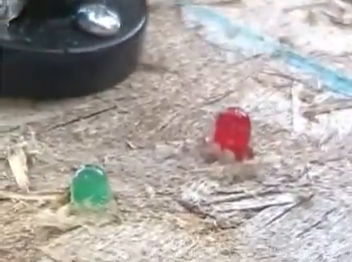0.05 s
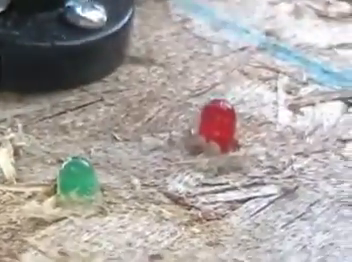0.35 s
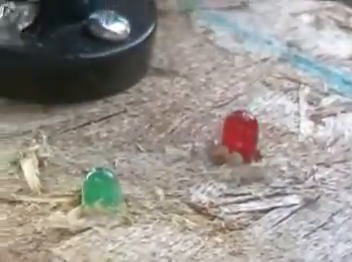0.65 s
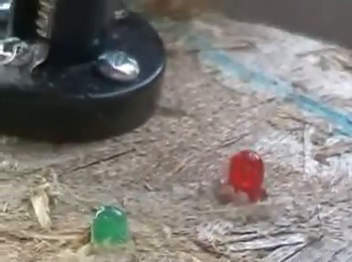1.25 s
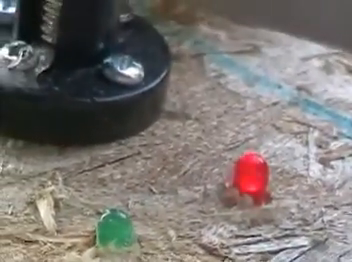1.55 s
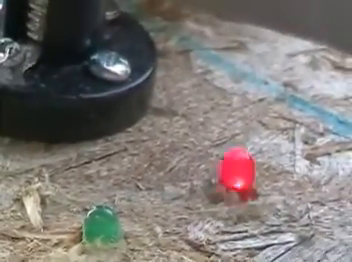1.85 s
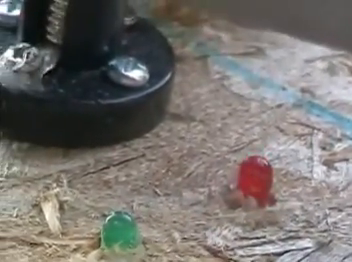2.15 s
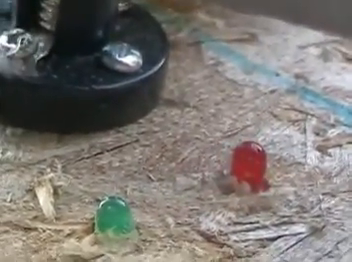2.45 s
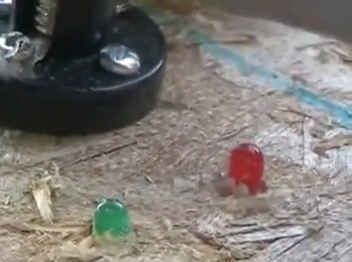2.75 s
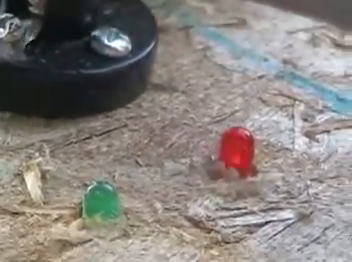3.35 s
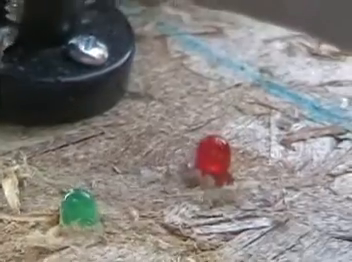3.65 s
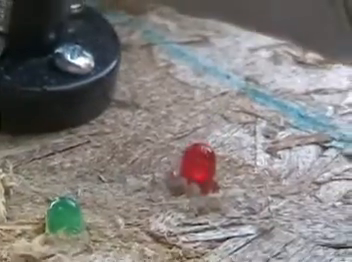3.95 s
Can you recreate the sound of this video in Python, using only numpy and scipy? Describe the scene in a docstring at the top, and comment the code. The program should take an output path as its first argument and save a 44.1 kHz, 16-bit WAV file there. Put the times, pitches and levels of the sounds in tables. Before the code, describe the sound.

A small generator clacks steadily for the whole four seconds, four or five hard, briefly ringing knocks a second, close up indoors. A low hum, rumble and fine watery hiss run underneath throughout. Lighter rattles, short scratches and dull bumps of a wooden board fall between the clacks, strongest at about 1.5 seconds, again from 2.4 to 2.8, and around 3.3 seconds.

```python
"""Small generator on a wooden board, indoors, close up.

A loose part clacks on the housing four or five times a second and rings its modes.
Lighter rattles, treble scratches, brief low tones and dull bumps of the board fall between.
Under them run a low hum, a rumble and a fine watery hiss. A limiter dips the gain after each clack."""
import sys
import numpy as np
from scipy import signal
from scipy.fft import rfft, irfft
from scipy.io import wavfile
from scipy.ndimage import uniform_filter1d, minimum_filter1d

SR = 44100
rng = np.random.default_rng(int(sys.argv[2]) if len(sys.argv) > 2 else 0)


def put_to_file(sound):
    """Save the sound as 16-bit audio at rate SR, in the file named by the first command-line argument."""
    columns = np.atleast_2d(sound).T  # one column per channel
    safe = np.clip(columns, -1, 1)
    whole_steps = np.round(safe * 32767)
    wavfile.write(sys.argv[1], SR, whole_steps.astype(np.int16))


N = 176400

# Generator tones. Each row: frequency in Hz, level in dB, rms waver in Hz.
HUM_TONES = [(118.05, -32.5, 0.99), (59.9, -48, 5.1), (72.2, -50.5, 2.3), (185.7, -46, 5.4),
             (440.4, -49.5, 4.88), (545, -54.5, 5.24), (640.7, -46.5, 4.44)]
# Rumble spectrum. Each row: frequency in Hz, gain in dB.
RUMBLE_EQ = [(20, -52), (35, -30), (55, -31), (80, -19), (108, -12.5), (140, -10.5), (180, -16.5),
             (250, -17), (320, -18), (385, -33.5), (600, -26.5), (2000, -88)]
# Hiss spectrum. Each row: frequency in Hz, gain in dB.
HISS_EQ = [(100, -79), (380, -30.5), (480, -26), (700, -23), (1000, -22.5), (2000, -22), (2800, -25),
           (4000, -28), (5000, -34.5), (6300, -40.5), (8000, -42), (10000, -38), (12500, -46.5),
           (14500, -58)]
# Hiss envelope. Each row: time in seconds, gain in dB.
HISS_ENVELOPE = [(0, -1.5), (.5, 2.5), (1, -0.5), (1.5, 2.5), (1.8, 1), (2.2, 1.5), (2.6, 3), (2.95, 1),
                 (3.3, 3.5), (3.65, 2), (3.85, 2), (4, 1)]
# Housing modes. Each row: frequency in Hz, level in dB, T60 in seconds.
HOUSING_MODES = [(640, -11, 0.12), (755, -0.5, 0.066), (960.3, 1.5, 0.1), (1190, -7.5, 0.22),
                 (1300, -6, 0.047), (1476.1, 3, 0.16), (1590, -2.5, 0.11), (1769, -12, 0.21),
                 (2080, -4, 0.06), (2485, -35, 0.064), (2526, -35, 0.079), (2990, 5, 0.052),
                 (3460, -12, 0.031), (4360, -16, 0.023)]
# Contact rasp spectrum. Each row: frequency in Hz, gain in dB.
RASP_EQ = [(100, -7), (380, -8), (650, -7), (1000, -2), (2000, -1.5), (3000, -3), (4300, -2.5),
           (5200, -13.5), (6300, -16), (8000, -23), (10000, -23), (14500, -40)]
# Contact rasp decay. Each row: frequency in Hz, T60 in seconds.
RASP_T60 = [(400, 0.094), (1500, 0.14), (3000, 0.043), (6000, 0.047), (14000, 0.013)]
# Light blows. Each row: start in seconds, level in dB, boosted frequency in Hz.
RATTLE_HITS = [(.044, -22.5, 3560), (.369, -18.5, 1740), (0.718, -14, 2140), (.798, -21, 790),
               (1.17, -15, 740), (1.255, -21, 1890), (1.484, -12, 1470), (1.505, -4.5, 930),
               (1.595, -39, 2900), (2.125, -30, 1390), (2.411, -10, 990), (2.48, -15.5, 2000),
               (2.578, -12, 1390), (2.6, -11, 880), (2.656, -13, 1010), (2.722, -11.5, 960),
               (2.755, -21, 650), (3.029, -27, 1900), (3.206, -17, 760), (3.262, -18, 1980),
               (3.459, -17, 2020), (3.792, -18, 2200), (3.842, -17, 1010)]
# Treble bursts. Each row: start in seconds, level in dB.
SCRATCH_BURSTS = [(.1, 3.5), (.335, -1.5), (.555, -4), (.68, 0.5), (.775, -18), (1.485, 3), (1.516, 11.5),
                  (1.608, 7), (2.411, 7), (2.515, -22), (2.58, -7), (2.612, 7), (2.77, -9), (2.979, 3),
                  (3.303, 9), (3.346, 9.5), (3.396, 5), (3.445, 0), (3.814, 5), (3.845, -5), (3.88, -1)]
# Scratch spectrum. Each row: frequency in Hz, gain in dB.
SCRATCH_EQ = [(1000, -60), (3000, -42), (5000, -30), (6300, -41), (8000, -37), (10000, -29.5),
              (12500, -39.5), (14500, -52)]
# Main blows. Each row: start in seconds, level in dB, then knock, ring, clang and treble gains in dB.
CLACK_HITS = [(0.1932, -2.4, -1.2, -1, 5, 2), (0.4236, 1.8, 4.8, 7, 13, 4.5), (0.6435, -2, -1, 2.7, -1, 3),
              (0.877, -1.1, 2.1, -1, 5, 2.5), (1.11, -1.4, -8.3, -10, -5.5, -8),
              (1.307, -0.5, 4.7, 4, 4, 3.7), (1.528, -0.6, -4, 4.5, 2, -0.5), (1.7226, -2, 2.5, 4, 6, 1),
              (1.939, -1, 0.8, -0.5, 2, 0), (2.1585, 1.0, -4, 1.5, 0.5, -1),
              (2.3584, -2.1, 4.5, 2.32, 0, 2.5), (2.6348, -1.9, 3.5, 2.5, 5, 6.5),
              (2.8635, -2, 1.5, 1.5, 5, 5.5), (3.064, -1.2, 0.2, -6.72, 5, 7),
              (3.297, -1.3, -4.5, -8.5, 1.5, -8.5), (3.498, -1.2, -0.5, 1, 2, 3),
              (3.7203, -0.5, -3.5, -8.5, -2.5, -1.5), (3.923, -1, 0.5, -5, 7, 4.5)]
# Knock, ring, clang and treble frequencies in Hz.
CLACK_BANDS_HZ = [1080, 1600, 1670, 3400]
# Brief tones. Each row: start in seconds, length in seconds, frequency in Hz, level in dB.
SWELL_TONES = [(.36, .42, 188, -36), (2.745, .05, 645, -29), (3.19, .11, 540, -35), (3.385, .09, 635, -36)]
# Shoves on the board. Each row: start in seconds, level in dB, hold in seconds.
BUMP_HITS = [(.478, -21, 0.034), (1.149, -22.5, 0.036), (1.502, -14.5, 0.025), (2.24, -21, 0.027),
             (2.425, -20, 0.015), (2.566, -27, .025), (2.75, -22, 0.014), (3.215, -25, 0.06),
             (3.353, -18.5, 0.018), (3.788, -25.5, 0.061), (3.885, -21.5, 0.036)]
# Board modes. Each row: frequency in Hz, level in dB, T60 in seconds.
BOARD_MODES = [(107.7, -3.5, 0.22), (136, -3.5, 0.073), (198.5, -11, 0.065), (281.5, -11, 0.053)]
# Thud spectrum. Each row: frequency in Hz, gain in dB.
THUD_EQ = [(60, -15), (150, 1), (300, 7.5), (400, 2), (600, 2.5), (1200, -13), (4000, -33)]
# Room decay. Each row: frequency in Hz, T60 in seconds.
ROOM_T60 = [(200, 0.53), (1500, 0.18), (5000, 0.12), (12000, 0.071)]
# Likeness of the two mic ports. Each row: frequency in Hz, coherence from 0 to 1.
PORT_COHERENCE = [(100, 1), (250, 1), (500, .95), (1500, 0.96), (4000, 0.75), (6300, 1), (9000, 1),
                  (14000, 0.72)]
# Port balance. Each row: frequency in Hz, left minus right in dB.
PORT_BALANCE = [(60, 3), (140, 2), (260, 0), (490, 3.5), (800, 3.5), (1500, 4.5), (2100, 5.5), (2900, 8),
                (4100, 3.5), (6200, -2.5), (9500, 0.5), (14500, 10.5)]
# Port phase. Each row: frequency in Hz, left lead in radians.
PORT_LEAD = [(100, 0), (700, 0.49), (2300, 0.56), (4300, -0.44), (6200, 1.12), (8000, 1.5), (9200, 4),
             (12000, 3.5), (14000, 5)]


def amp(db):
    """Decibels to gain."""
    return 10 ** (np.asarray(db) / 20)


def unit_rms(x):
    """Scale to rms 1."""
    return x / np.sqrt(np.mean(x ** 2) + 1e-20)


def lookup(table, hz):
    """Interpolate on a log-frequency axis."""
    table_hz, value = np.transpose(table)
    return np.interp(np.log(hz + 1), np.log(table_hz + 1), value)


def add(mix, start_s, sound):
    """Mix a sound in at start_s."""
    part = mix[..., max(round(start_s * SR), 0):][..., :sound.shape[-1]]
    part += sound[..., :part.shape[-1]]


def equalize(x, eq):
    """Filter by rows of Hz and dB."""
    size = x.shape[-1]
    gain = amp(lookup(eq, np.fft.rfftfreq(2 * size, 1 / SR)))
    return irfft(rfft(x, 2 * size) * gain)[..., :size]


def band_decay(x, t60_table, hold_s=0):
    """Hold, then fade each band at its own rate."""
    hz, t, bands = signal.stft(x, SR, nperseg=128)
    fade = amp(-60 * np.maximum(t - hold_s, 0) / lookup(t60_table, hz)[:, None])
    return signal.istft(bands * fade, SR)[1][..., :x.shape[-1]]


def drift(shape, size):
    """Smooth noise of rms 1 along the last axis."""
    smooth = uniform_filter1d(rng.standard_normal(shape), size, mode="wrap")
    return unit_rms(uniform_filter1d(smooth, size, mode="wrap"))


def hum():
    """The generator's wavering tones over a low rumble."""
    tones = np.zeros(N)
    for hz, db, waver_hz in HUM_TONES:
        cycles = np.cumsum(hz + waver_hz * drift(N, size=3000)) / SR
        tones += amp(db) * np.sqrt(2) * np.sin(2 * np.pi * cycles)
    return tones + equalize(rng.standard_normal((2, N)), RUMBLE_EQ)


def housing(x, resonance_db, width_hz):
    """The housing lifts whatever rubs or runs in it at each mode."""
    size = x.shape[-1]
    hz = np.fft.rfftfreq(size, 1 / SR)
    peaks = sum(1 / (1 + ((hz - mode_hz) / (width_hz / 2)) ** 2) for mode_hz, _, _ in HOUSING_MODES)
    return irfft(rfft(x) * np.sqrt(1 + amp(resonance_db) ** 2 * peaks), size)


def wash(patch_db=2.85, flicker_db=0.96, fizz_db=3):
    """Watery noise that flickers in patches, as a whole and in the treble."""
    hz, t, bands = signal.stft(rng.standard_normal((2, N)), SR, nperseg=512)
    patches = unit_rms(uniform_filter1d(drift(bands.shape[1:], size=3), size=6, axis=0))
    fizz = np.clip(hz / 8000, 0, 1)[:, None] * drift(len(t), size=3)
    gain = amp(patch_db * patches + flicker_db * drift(len(t), size=2) + fizz_db * fizz)
    return unit_rms(signal.istft(bands * gain, SR)[1][:, :N])


def spatter(drops_per_s=440, spread_db=10, power_fade_s=0.0017):
    """Tiny noise bursts of random time and strength."""
    onsets = rng.random(N) < drops_per_s / SR
    drops = onsets * amp(spread_db * np.minimum(rng.exponential(1, N), 3))
    power = signal.lfilter([1], [1, -np.exp(-1 / (power_fade_s * SR))], drops ** 2)
    return unit_rms(np.sqrt(power) * rng.standard_normal((2, N)))


def hiss():
    """Wash and spatter, faintly coloured by the housing."""
    noise = housing(wash() + amp(-15.5) * spatter(), resonance_db=-1, width_hz=25)
    envelope_db = np.interp(np.arange(N) / SR, *np.transpose(HISS_ENVELOPE))
    return equalize(noise, HISS_EQ) * amp(envelope_db)


def blow(eq, rise_s, hold_s, ring_rise_s=0.005, grain_db=2.5, bounce_width_s=0.0025):
    """A loose part chatters on the housing, bounces once and leaves its modes ringing."""
    t = np.arange(SR // 4) / SR
    hz, db, t60_s = np.transpose(HOUSING_MODES)[:, :, None]
    detune, *phases = rng.standard_normal((3, len(HOUSING_MODES), 1))
    cycles = hz * (1 + 0.009 * detune) * t
    envelopes = amp(db - 60 * t / t60_s) * np.minimum(t / ring_rise_s, 1)
    ring = np.array([(envelopes * np.sin(2 * np.pi * (cycles + phase))).sum(0) for phase in phases])
    chatter = unit_rms(rng.standard_normal((2, len(t))) * amp(grain_db * drift(len(t), size=20)))
    bounce_s = 0.0094 * (0.5 + rng.random())
    chatter *= 1 + amp(0.5) * np.exp(-((t - bounce_s) / bounce_width_s) ** 2)
    chatter = housing(chatter, resonance_db=10.5, width_hz=49.4)
    rasp = equalize(band_decay(chatter, RASP_T60, hold_s), RASP_EQ)
    sound = equalize(amp(-6) * ring + rasp, eq) * np.minimum(t / rise_s, 1)
    return amp(-23) * np.array([unit_rms(side) for side in sound])


def rattles(boost_db=16.5, span_ratio=1.5):
    """Light, hollow blows on the housing, each boosted in one band."""
    out = np.zeros((2, N))
    for start_s, db, hz in RATTLE_HITS:
        eq = [(hz / span_ratio, 0), (hz, boost_db), (hz * span_ratio, 0)]
        add(out, start_s, amp(db) * blow(eq, rise_s=0.0071, hold_s=0.017))
    return out


def scratches(rise_s=0.0013, fade_s=0.021, grain_db=4.5):
    """Short grainy puffs of treble."""
    envelope, t = np.zeros(N), np.arange(SR // 8) / SR
    for start_s, db in SCRATCH_BURSTS:
        add(envelope, start_s, amp(db) * np.minimum(t / rise_s, 1) * np.exp(-t / fade_s))
    grains = unit_rms(rng.standard_normal((2, N)) * amp(grain_db * drift(N, size=40)))
    return equalize(envelope * grains, SCRATCH_EQ)


def clacks():
    """Hard blows of the loose part, each with its own colour."""
    out = np.zeros((2, N))
    for start_s, db, *bands_db in CLACK_HITS:
        eq = list(zip(CLACK_BANDS_HZ, bands_db))
        add(out, start_s, amp(db) * blow(eq, rise_s=0.0026, hold_s=0.0056))
    return out


def swells():
    """Brief low tones that rise and fade."""
    out = np.zeros(N)
    for start_s, length_s, hz, db in SWELL_TONES:
        t = np.arange(0, length_s, 1 / SR)
        add(out, start_s, amp(db) * np.sin(np.pi * t / length_s) * np.sin(2 * np.pi * hz * t))
    return out


def bumps(rise_s=0.0035, thud_fade_s=0.014):
    """Soft shoves thud on the board and swing its low modes."""
    out, t = np.zeros((2, N)), np.arange(SR // 3) / SR
    hz, mode_db, t60_s = np.transpose(BOARD_MODES)[:, :, None]
    for start_s, db, hold_s in BUMP_HITS:
        phase, detune = rng.standard_normal((2, len(BOARD_MODES), 1))
        released_s = np.maximum(t - hold_s, 0)
        envelopes = amp(mode_db - 60 * released_s / t60_s)
        swing = (envelopes * np.sin(2 * np.pi * (hz * (1 + 0.049 * detune) * t + phase))).sum(0)
        thud = equalize(rng.standard_normal((2, len(t))), THUD_EQ) * np.exp(-released_s / thud_fade_s)
        add(out, start_s, amp(db) * (swing + thud) * np.minimum(t / rise_s, 1))
    return out


def room(x, rise_s=0.0083):
    """Short diffuse reverb tail."""
    t = np.arange(SR // 2) / SR
    tail = band_decay(rng.standard_normal((2, len(t))), ROOM_T60) * np.minimum(t / rise_s, 1)
    return signal.fftconvolve(x, tail / np.linalg.norm(tail[0]), axes=1)[:, :N]


def mic_ports(x):
    """Two ports hear partly the same sound, apart in level and phase."""
    hz = np.fft.rfftfreq(N, 1 / SR)
    common, apart = rfft(x)
    coherence = np.clip(lookup(PORT_COHERENCE, hz), 0, 1)
    balance = amp(lookup(PORT_BALANCE, hz))
    right = coherence * common + np.sqrt(1 - coherence ** 2) * apart
    right *= np.exp(-1j * lookup(PORT_LEAD, hz))
    return irfft(np.array([common * balance, right]) * np.sqrt(2 / (1 + balance ** 2)), N)


def scene():
    """Blows with room reverb over the other, dry layers."""
    blows = clacks() + rattles()
    return mic_ports(blows + amp(-14.5) * room(blows) + bumps() + hum() + swells() + hiss() + scratches())


def record(dry, threshold_db=-18, slope=0.4, recover_db_per_s=37, ceiling=0.72):
    """Fast limiter with steady recovery, then low cut, peak ceiling and band limit."""
    power_db = 10 * np.log10(abs(uniform_filter1d((dry ** 2).mean(0), size=100)) + 1e-12)
    recovery_db = np.arange(N) * recover_db_per_s / SR
    peak_db = np.maximum.accumulate(power_db + recovery_db) - recovery_db
    over_db = np.maximum(peak_db - threshold_db, 0)
    limited = dry * amp(-0.5 - slope * uniform_filter1d(over_db, size=60))
    low_cut_hz, high_cut_hz = 39, 14700
    limited = signal.sosfilt(signal.butter(4, low_cut_hz, "high", fs=SR, output="sos"), limited)
    ceiling_gain = np.minimum(ceiling / (abs(limited).max(0) + 1e-9), 1)
    limited *= uniform_filter1d(minimum_filter1d(ceiling_gain, size=60), size=60)
    lowpass = signal.firwin(511, high_cut_hz, window=("kaiser", 9), fs=SR)
    return signal.oaconvolve(limited, lowpass[None], "same")


dry = scene()
out = record(dry)
put_to_file(out)
```